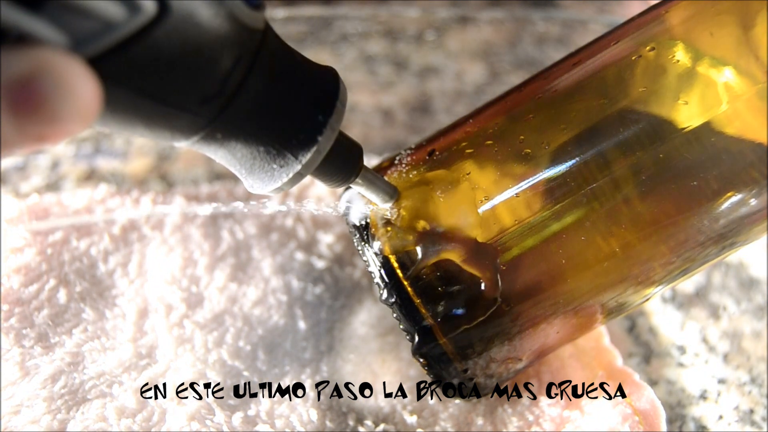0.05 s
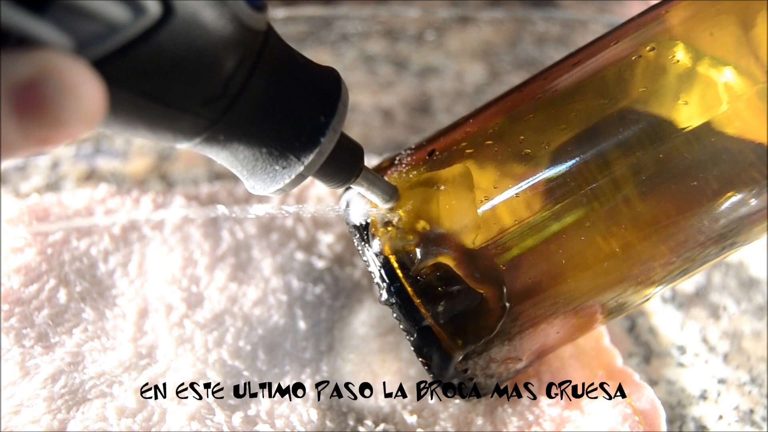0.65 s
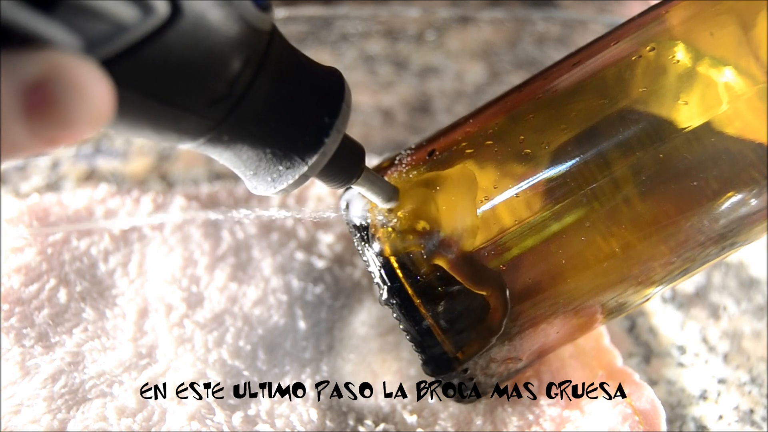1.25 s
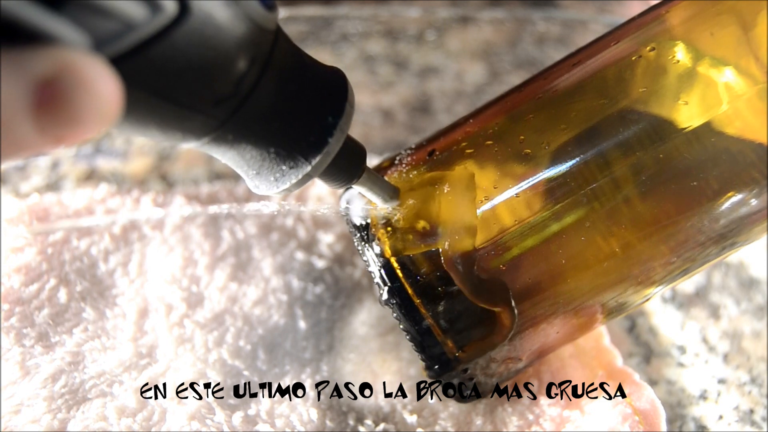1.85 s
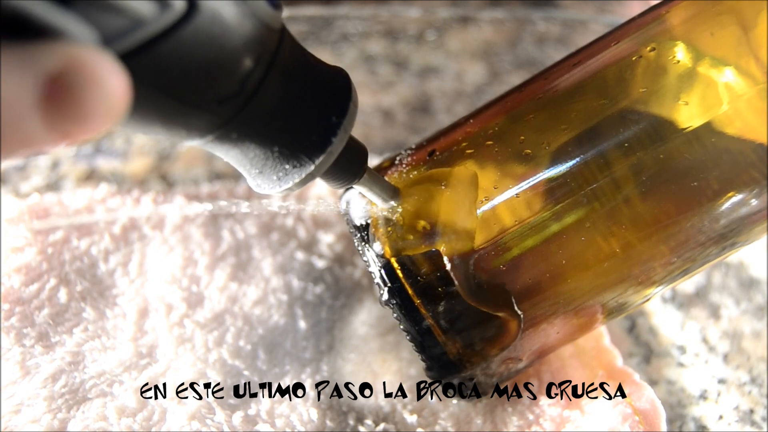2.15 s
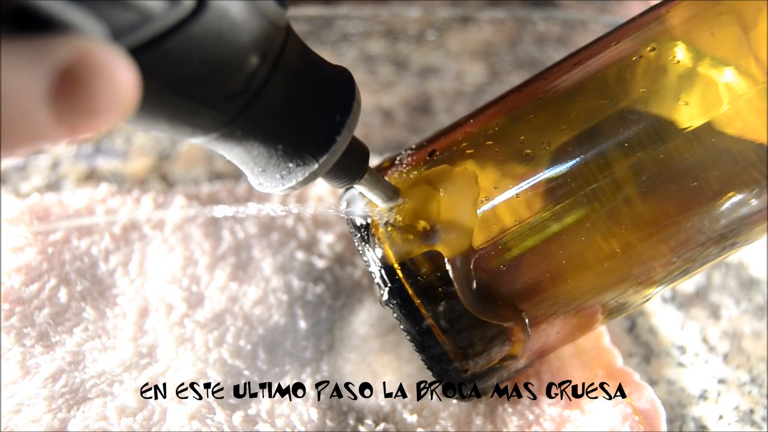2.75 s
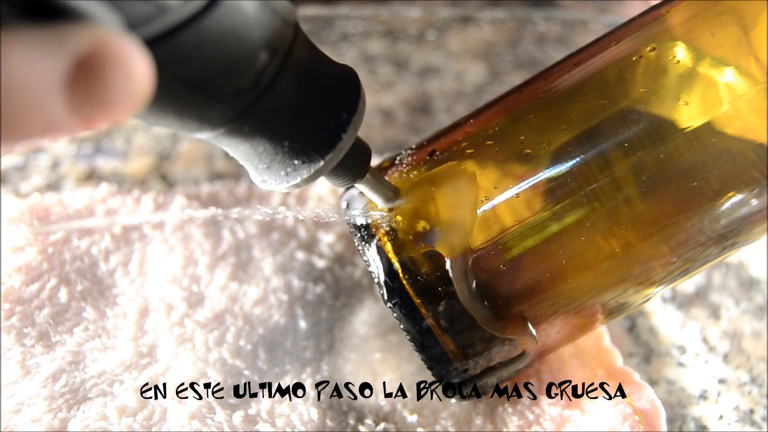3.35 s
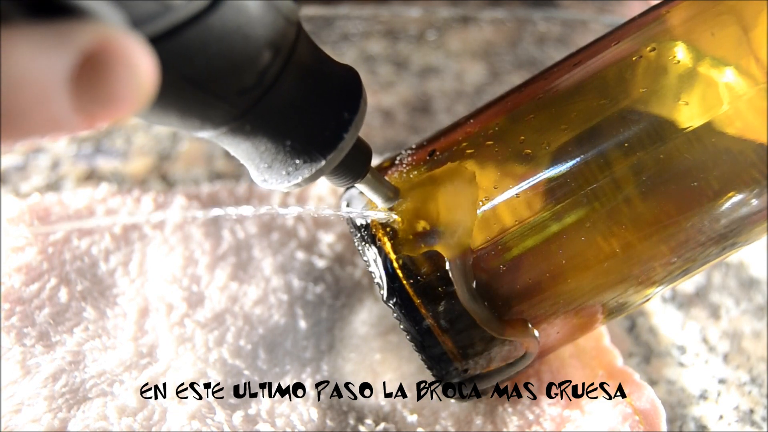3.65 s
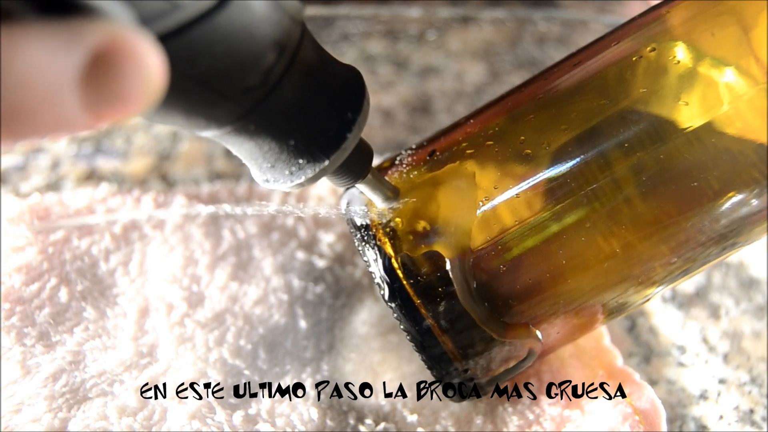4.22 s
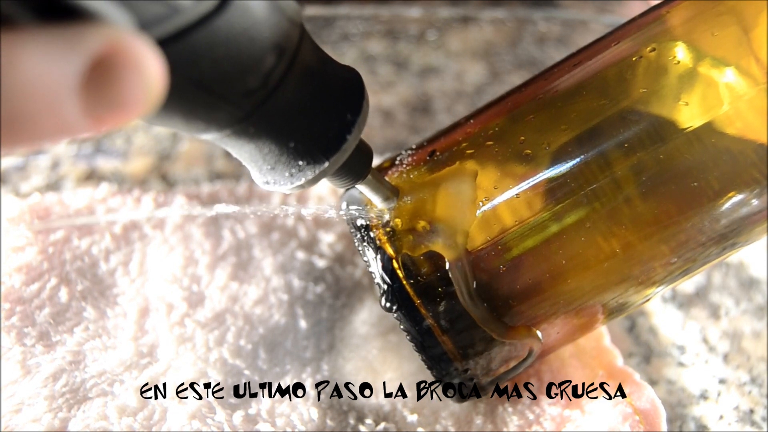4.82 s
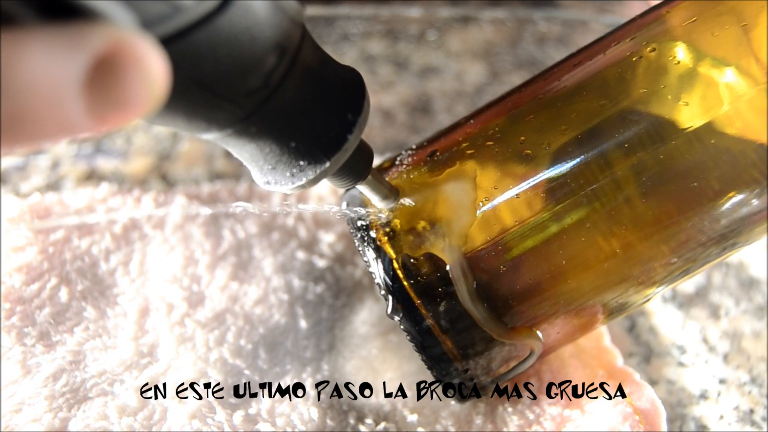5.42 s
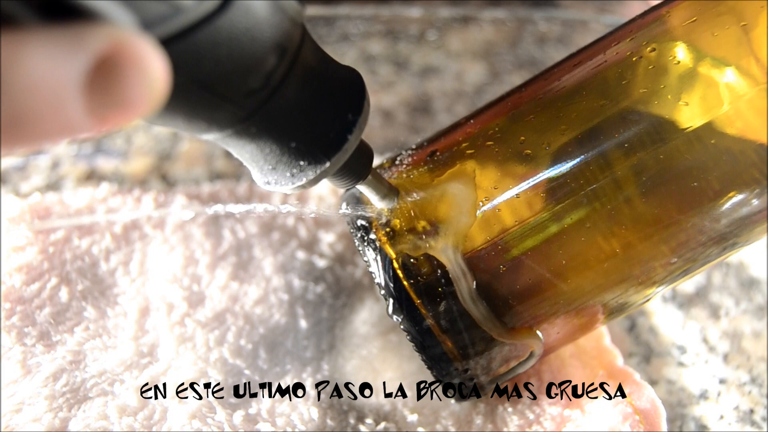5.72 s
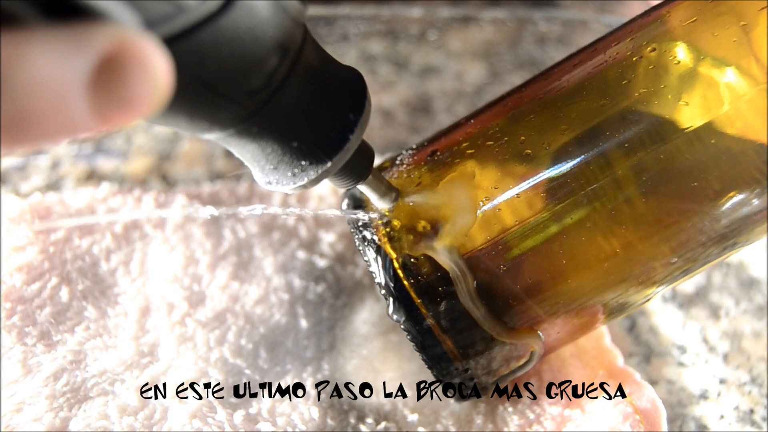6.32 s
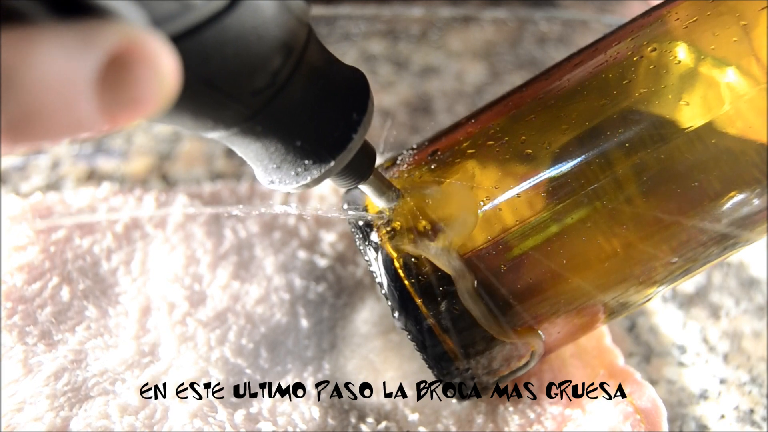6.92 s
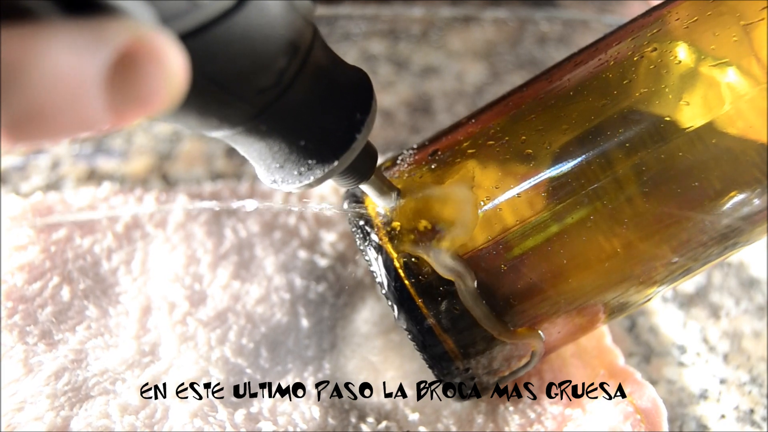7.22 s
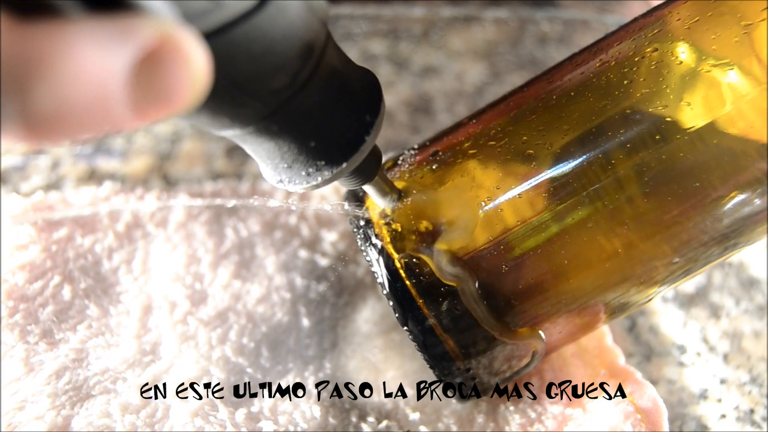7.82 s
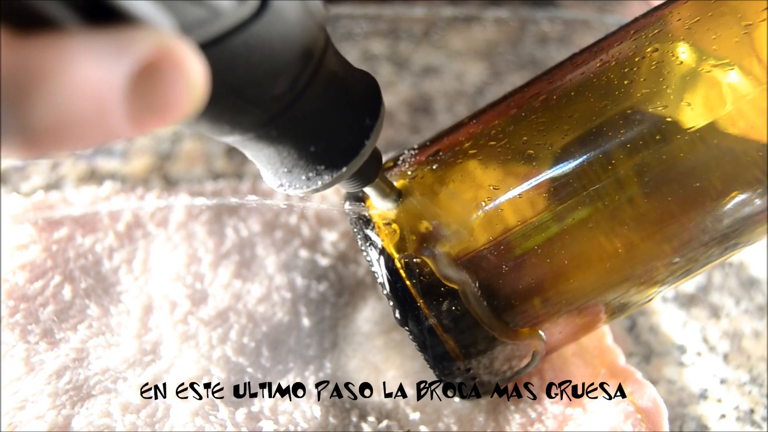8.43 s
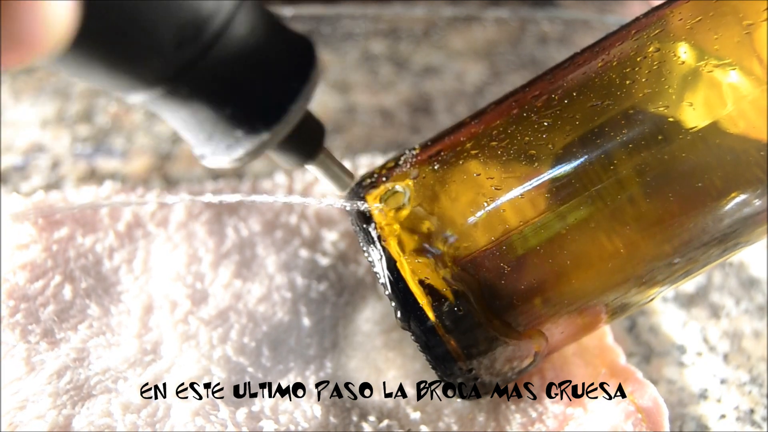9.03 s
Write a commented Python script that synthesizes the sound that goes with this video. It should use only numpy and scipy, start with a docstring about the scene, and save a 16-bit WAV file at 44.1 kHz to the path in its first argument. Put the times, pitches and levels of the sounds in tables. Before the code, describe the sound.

A handheld rotary tool whines at high speed as its bit grinds into a wet glass bottle, close to the microphone. Shrill scratching alternates with short, growling bites that make the glass ring. From about halfway a buzzing chatter grows and the motor's pitch sinks. Near the end the bit jams with a squeal and sharp clicks, scrapes the rim, knocks it and comes free, and the motor revs up.

```python
"""Drilling a glass bottle.

A handheld rotary tool grinds a hole through a wet glass bottle, close by. The bit takes turns biting
into the wall and skittering over it, touching once every turn. Pressed harder, it chatters and the motor
slows. It jams with a squeal, picks up speed, knocks the rim and comes free, and the motor revs up."""
import sys
import numpy as np
from scipy import signal
from scipy.fft import rfft, irfft, next_fast_len
from scipy.io import wavfile
from scipy.ndimage import map_coordinates

SR = 44100
rng = np.random.default_rng(int(sys.argv[2]) if len(sys.argv) > 2 else 0)


def materialize(psi):
    """Save the field psi as 16-bit PCM at rate SR to the path in sys.argv[1].

    A 1-D psi becomes a single channel; in a 2-D psi each row is a channel.
    """
    bounded = np.clip(np.atleast_2d(psi).T, -1, 1)
    quanta = np.round(bounded * 32767).astype(np.int16)
    wavfile.write(sys.argv[1], SR, quanta)


N = 404397
T = np.arange(N) / SR
JAM_S, FREE_S = 8.048, 8.958  # when the bit jams and when it comes free


def amp(db):
    """Turn decibels into a gain."""
    return 10 ** (np.asarray(db) / 20)


def unit(x):
    """Scale a signal to an average power of 1."""
    return x / np.sqrt(np.mean(x ** 2) + 1e-20)


def along(points, hz):
    """Read a (frequency, value) table at any frequency, on a log scale."""
    freqs, values = np.transpose(points)
    return np.interp(np.log(hz + 1), np.log(freqs), values)


def curve(points):
    """Join (time, value) points with straight lines."""
    return np.interp(T, *np.transpose(points))


def wobble(rate):
    """A smooth random curve with `rate` new values a second."""
    return map_coordinates(rng.standard_normal(int(N * rate / SR) + 4), [T * rate])


def swell(s, half_length):
    """A bell-shaped rise and fall around time s."""
    return np.exp(-.5 * ((T - s) / half_length) ** 2)


def bump(t, middle, length, steepness=3.1):
    """A flat-topped rise and fall."""
    return .5 ** np.minimum(np.abs(2 * (t - middle) / length), 10) ** steepness


def bursts(rows):
    """The summed power of (middle, length, level) bumps."""
    t = T[::20]
    return np.interp(T, t, sum(amp(db) ** 2 * bump(t, s, length) for s, length, db in rows))


def filtered(x, response):
    """Scale each frequency in x by response(frequency)."""
    size = next_fast_len(N + SR // 2)
    return irfft(rfft(x, size) * response(np.fft.rfftfreq(size, 1 / SR)), size)[:N]


def coloured(x, spectrum):
    """Shape x with a (frequency, level) table, at a power of 1."""
    return unit(filtered(x, lambda hz: amp(along(spectrum, hz))))


def turns_of(speed, waver):
    """Turns made so far at a slightly unsteady speed."""
    return np.cumsum(speed * (1 + waver * wobble(25))) / SR


def grit(turns, memory, fresh_db, size=256):
    """A rough surface passes once a turn and wears over `memory` turns; chips add fresh noise."""
    surface = rng.standard_normal((int(turns[-1]) + 2, size))
    surface = signal.lfilter([1], [1, -np.exp(-1 / memory)], surface, axis=0)
    passing = unit(map_coordinates(surface.ravel(), [turns * size]))
    return passing + amp(fresh_db) * rng.standard_normal(N)


def touch(turns, depth_db, scatter_db):
    """The off-centre bit presses on the glass once a turn, never twice alike."""
    return amp(depth_db * np.cos(2 * np.pi * turns) + scatter_db * wobble(200))


def harmonics(turns, speed, spectrum, flutter_db, top, fourth_db=0):
    """Tones at multiples of a turning speed, shaped by the body they shake; high ones flutter more."""
    out = np.zeros(N)
    for k in range(3, top + 1):
        db = along(spectrum, k * speed) + fourth_db * (k % 4 == 0)
        db += flutter_db * k / top * wobble(28)
        out += amp(db) * np.sin(2 * np.pi * (k * turns + rng.random()))
    return out


# The steady growl as the hand feeds the bit in: (time [s], level [dB])
FEED_LEVEL = [(0, -22.5), (3.6, -22.5), (4.6, -18), (6.2, -19), (7.1, -18), (8.0, -16.5), (8.35, -22.5),
              (8.95, -21.5)]
# The bit digs into the wall: (middle [s], length [s], level [dB])
BITE_BURSTS = [(.02, 0.071, -20), (.225, 0.067, -21), (.47, 0.047, -19), (.54, 0.027, -20.5),
               (.605, 0.036, -19), (.68, 0.016, -19.5), (.745, 0.087, -18.5), (.975, 0.054, -19),
               (1.23, 0.036, -18.5), (1.47, 0.12, -18.5), (1.66, 0.035, -21), (1.76, 0.037, -20.5),
               (1.835, 0.028, -19), (1.94, 0.05, -19.5), (2.01, 0.031, -19.5), (2.125, 0.15, -18.5),
               (2.31, 0.044, -19), (2.425, 0.018, -19), (2.49, 0.0582, -19), (2.685, 0.073, -19.5),
               (2.84, 0.073, -17.5), (2.955, 0.057, -18.5), (3.15, 0.089, -19), (3.32, 0.028, -19.5),
               (3.545, 0.037, -17.5), (3.795, 0.042, -16.5), (4.23, 0.052, -18.5), (4.345, 0.063, -20)]
def bite_rise_db():
    """How far the bites rise above the steady feed."""
    return 10 * np.log10(1 + bursts(BITE_BURSTS) / amp(curve(FEED_LEVEL)) ** 2)


# Instants of lost grip: (middle [s], length [s], depth [dB])
GRIP_LOSSES = [(4.669, 0.012, 7), (4.93, 0.011, 6), (5.532, 0.018, 4.5), (5.6, 0.013, 8), (5.746, 0.022, 6),
               (6.665, 0.045, 3.5), (7.027, 0.029, 3.5), (8.054, 0.012, 16), (8.091, 0.03, 8.5)]
def grip_db():
    """The level dips while the bit loses its grip on the wall."""
    return -sum(depth * bump(T, s, length) for s, length, depth in GRIP_LOSSES)


# The motor's speed up to the jam, before bites slow it: (time [s], speed [turns/s])
BASE_SPEED = [(0, 204.7), (.78, 206), (1.25, 209.6), (2.0, 211.9), (2.33, 210.3), (2.8, 212.7),
              (3.1, 210.8), (4.17, 210.9), (4.38, 205.9), (4.72, 208.9), (5.0, 206.8), (5.5, 198),
              (6.0, 196.2), (6.6, 189), (7.02, 180.8), (7.65, 185), (7.97, 178.8)]
# The motor jams, recovers, then revs up: (time [s], target speed [turns/s], settling time [s])
SPEED_CHANGES = [(8.03, 140, .025), (8.08, 163.5, .33), (8.915, 228, .36)]
def motor_speed():
    """Turns a second: the motor settles after each sudden change of load and sags with each bite."""
    speed = curve(BASE_SPEED)
    for s, target, lag in SPEED_CHANGES:
        settling = target + (speed[int(s * SR)] - target) * np.exp(-np.maximum(T - s, 0) / lag)
        speed = np.where(T < s, speed, settling)
    return speed - .25 * bite_rise_db()


# How strongly the tool's body hums at each pitch: (frequency [Hz], level [dB])
HUM_SPECTRUM = [(150, -57), (197, -56), (205, -49), (295, -45), (345, -68), (365, -46.5), (380, -63),
                (408, -56), (422, -50)]
def rotor_hum(turns, speed):
    """The unbalanced rotor hums at its turning speed and an octave above."""
    hum = np.zeros(N)
    for k in (1, 2):
        db = along(HUM_SPECTRUM, k * speed) + k * .86 * wobble(25)
        hum += amp(db) * np.sin(2 * np.pi * k * turns)
    return np.sqrt(2) * hum


# The tone of the plastic housing: (frequency [Hz], level [dB])
HOUSING_SPECTRUM = [(1650, -18.5), (1870, -3.5), (2060, -21), (2290, -7), (2550, -20), (2740, -4.5),
                    (3000, -6), (3150, 0.5), (3290, 2), (3400, -13), (3560, -11), (3700, 3), (3790, -2.5),
                    (3890, 7), (3990, -9), (4110, -7), (4500, -34)]
def housing_buzz(turns, speed, free):
    """The motor shakes its housing once a turn; less so in a bite, pressed hard or running free."""
    pressed = 1 + amp(curve(CHATTER_LEVEL) + 22.5) ** 2
    gain = amp(-28 - 19 * free - .87 * bite_rise_db()) / pressed * (speed / 208) ** 3
    return gain * harmonics(turns, speed, HOUSING_SPECTRUM, flutter_db=3.5, top=22)


def commutator_whine(turns, free, pulses_per_turn=18):
    """The motor's spinning contacts whine, standing out once the bit is free."""
    return amp(-39.5 + 13.7 * free) * np.sin(2 * np.pi * pulses_per_turn * turns)


# The rush of air in the tool: (frequency [Hz], level [dB])
FAN_SPECTRUM = [(30, -46), (130, -26.5), (300, -13), (600, -14), (1220, 6), (1850, 2), (2550, -2.5),
                (3200, 0.5), (4100, -8), (7000, -2), (8000, -13.5), (9300, -7), (11400, -29)]
def fan_air(turns, speed, free):
    """The fan blows air through the vents, louder the faster it spins."""
    air = coloured(grit(turns, memory=6.9, fresh_db=4.5), FAN_SPECTRUM)
    return amp(-29 + 7.6 * free) * (speed / 200) ** 3 * air


# The bit catches and jolts the bottle: (time [s], half length [s], level [dB])
JOLTS = [(6.953, .005, -38), (7.005, 0.0061, -33), (8.041, .01, -27.5), (8.06, 0.0047, -27)]
def bottle_shudder():
    """The bottle shudders in the hand at each catch and trembles while the bit rubs the rim."""
    jolts = sum(amp(db) * swell(s, half) for s, half, db in JOLTS)
    tremble = amp(-41.5 + 2.5 * wobble(20)) * (T > JAM_S) * (T < FREE_S)
    rumble = coloured(rng.standard_normal(N), [(30, -22), (300, 5.5), (700, 10), (2000, -30)])
    return (jolts + tremble) * rumble


# The bit knocks and chips the rim: (time [s], level [dB])
RIM_KNOCKS = [(4.31, -13), (6.948, -14), (7.004, -11), (8.029, -11), (8.042, -11), (8.059, -6),
              (8.859, -1.5), (8.864, -2)]
# The notes of the knocked bottle: (frequency [Hz], level [dB])
GLASS_NOTES = [(650, -8), (1020, -1), (1380, 0), (1620, 0), (1950, -3), (2720, -7), (4000, -8)]
def knocks(ring_s=.014, crumble_s=.05):
    """Sharp blows trailed by splinters ring the bottle; the hand quickly damps it."""
    splinters = unit(rng.standard_normal(N) ** 3)
    trails = sum(amp(db - 60 * np.abs(T - s) / crumble_s) * (T >= s) for s, db in RIM_KNOCKS)
    force = amp(-21) * splinters * trails
    for s, db in RIM_KNOCKS:
        force[int(s * SR)] += amp(db)
    t = T[:SR // 10]
    ring = sum(amp(db - 60 * t / ring_s) * np.cos(2 * np.pi * hz * t) for hz, db in GLASS_NOTES)
    struck = signal.fftconvolve(force, ring / np.abs(ring).max())[:N]
    return amp(2) * filtered(struck, lambda hz: hz ** 3 / (hz ** 3 + 450 ** 3))  # too small for bass


# Short squeaks of the bit: (time [s], half length [s], pitch [Hz], level [dB])
BIT_SQUEAKS = [(6.947, 0.007, 2870, -23), (7.007, 0.0043, 2837, -22), (8.02, 0.012, 2898, -18),
               (8.032, 0.0064, 3160, -14), (8.051, 0.0051, 3420, -15.5), (8.061, .012, 3160, -19),
               (8.72, 0.013, 2790, -22), (8.927, 0.02, 1584, -26)]
def squeaks():
    """The bit sticks and slips, singing at an unsteady pitch; shorter squeaks are rougher."""
    waver, out = wobble(700), np.zeros(N)
    for s, half, hz, db in BIT_SQUEAKS:
        near = np.abs(T - s) < 4 * half
        phase = 2 * np.pi * hz * np.cumsum(1 + .0007 / half * waver[near]) / SR
        tone = np.sin(phase) + amp(-16) * np.sin(3 * phase)
        out[near] += amp(db + 5.5) * swell(s, half)[near] * tone
    return out


# The notes of the rubbed rim: (frequency [Hz], half width [Hz], level over the scratching [dB])
RIM_NOTES = [(739, 22, -5.5), (1188, 17, -1.5), (2225, 12, -10.5), (2830, 30, -8.5), (5090, 57.4, -6.5),
             (5602, 39, -7)]
def rim_squeal(speed, laps_per_turn=.995):
    """The bit rubs the open rim; as it speeds up, one harmonic after another hits a note and sings."""
    rubbing = (T > JAM_S) & (T < FREE_S)
    lap_hz = (speed * (laps_per_turn + .0027 * wobble(150)))[rubbing]
    laps, out = np.cumsum(lap_hz) / SR, np.zeros(N)
    for hz, width, db in RIM_NOTES:
        tone = sum(np.sin(2 * np.pi * k * laps) / (1 + ((k * lap_hz - hz) / width) ** 2)
                   for k in range(1, 38))
        out[rubbing] += amp(db + 3.2 * wobble(50)[rubbing]) * tone
    fade_in = np.clip((T - JAM_S) / .088, 0, 1)
    return out * amp(curve(SCRATCH_LEVEL)) * fade_in


# The chatter of the bit under pressure: (time [s], level [dB])
CHATTER_LEVEL = [(0, -38.5), (3.3, -37.5), (3.9, -30), (4.4, -31.5), (4.65, -26.5), (5.3, -25.5),
                 (5.9, -28.5), (6.4, -26), (7.1, -27.5), (7.7, -25.5), (7.98, -25.5), (8.02, -47)]
# The rolling bit slips more under load: (speed [turns/s], rolling [laps/turn])
LAPS_PER_TURN = [(184, .978), (208.5, .986)]
# The tone of the wall as the bit rolls on it: (frequency [Hz], level [dB])
WALL_SPECTRUM = [(540, -33), (625, -13), (715, 0), (776, -1.5), (820, -3), (893, -3.5), (942, 4), (970, -9),
                 (1030, -11.5), (1330, -12), (1430, -10), (1510, -3.5), (1552, 3.5), (1610, -2.5),
                 (1760, -3.5), (1850, 0.5), (1980, -14.5), (2260, -5.5), (2550, -15)]
def chatter(speed):
    """The bit rolls round the hole and makes the wall buzz; bites and lost grip break the tone."""
    lap_hz = speed * along(LAPS_PER_TURN, speed)
    laps = turns_of(lap_hz, waver=.0012)
    # Four strikes a lap lift every fourth harmonic.
    tone = harmonics(laps, lap_hz, WALL_SPECTRUM, flutter_db=2.5, top=13, fourth_db=5)
    level_db = curve(CHATTER_LEVEL) + 1 + grip_db() - 1.5 * bite_rise_db()
    return amp(level_db) * tone * (T < FREE_S)


# The glass ringing under a bite: (frequency [Hz], level [dB])
RING_SPECTRUM = [(800, -42), (1230, 7), (1340, -17), (1470, 0.5), (1660, 1), (2100, -28)]
def wall_ring(turns, speed, bite_db, wall_hz=1250):
    """Hard bites ring the wall; it sings when the sixth harmonic meets its note, and hoots below."""
    in_tune = np.exp(-((6 * speed - wall_hz) / 45) ** 4)
    sing = amp(-20.5 + 3.6 * np.minimum(bite_db + 17, 1)) * np.sin(2 * np.pi * 6 * turns)
    hoot = amp(-30.5 + .47 * (bite_db + 23) + 4.9 * wobble(60)) * np.sin(2 * np.pi * 3 * turns)
    # Both fade once the bit starts to roll, the hoot first.
    rolling_db = curve(CHATTER_LEVEL)
    sing /= 1 + amp(rolling_db + 31.5) ** 2
    hoot /= 1 + amp(rolling_db + 36) ** 2
    rough_ring = coloured(grit(turns, memory=3.9, fresh_db=-2.5), RING_SPECTRUM)
    return in_tune * (sing + hoot) + amp(-4.5) * np.sqrt(bursts(BITE_BURSTS)) * rough_ring


# The low sound of glass being ground: (frequency [Hz], level [dB])
GROWL_SPECTRUM = [(130, -51), (420, -27), (560, -22.5), (660, -12), (1000, -11.5), (1150, -6.5),
                  (1340, -8.5), (1830, -2), (2050, -13.5), (2550, -15), (3500, -17), (3950, -4),
                  (4600, -13.5), (11000, -48)]
def growl(turns, bite_db):
    """The biting bit drags over rough glass, pressing once a turn."""
    rubbing = grit(turns, memory=3.8, fresh_db=-2.5) * touch(turns, depth_db=2.7, scatter_db=2)
    return amp(bite_db - 2) * coloured(rubbing, GROWL_SPECTRUM)


# The bit's steady scratching: (time [s], level [dB])
SCRATCH_LEVEL = [(0, -17.5), (2.3, -16.5), (4.4, -18.5), (7.3, -18.5), (8.11, -19.5), (8.27, -15.5),
                 (8.81, -15.5), (8.89, -27)]
# Shrill skids over the glass: (middle [s], length [s], level [dB])
SKID_BURSTS = [(.11, 0.037, -20), (.56, 0.037, -19), (.67, 0.032, -19.5), (1.055, 0.046, -18),
               (1.195, 0.043, -18), (1.36, 0.025, -17.5), (1.45, 0.053, -20), (1.57, 0.033, -25),
               (1.745, 0.044, -18), (1.94, 0.041, -19), (2.58, 0.043, -21), (2.75, 0.026, -21),
               (2.935, 0.057, -18), (3.0, 0.037, -22), (3.2, 0.056, -20.5), (3.28, 0.042, -21),
               (3.45, 0.042, -18.5), (3.7, 0.061, -18), (4.09, 0.06, -18), (4.195, 0.024, -15),
               (4.315, 0.019, -15.5), (4.64, 0.059, -20), (7.0, 0.02, -19), (8.945, 0.044, -15.5)]
# The bright sound of scratched glass: (frequency [Hz], level [dB])
SCRATCH_SPECTRUM = [(500, -40), (2250, -11), (2550, -16.5), (2800, -8.5), (3450, -14.5), (4030, -6.5),
                    (4380, -11.5), (4680, -17.5), (5120, -0.5), (5300, -2), (5520, 2.5), (5820, -3),
                    (6130, -0.5), (6900, -1.6), (7130, -10), (7950, -16.5), (9100, -12.5), (9680, -8.5),
                    (10550, -18.5), (10800, -13), (11400, -43)]
def scratching(speed, bite_db):
    """A fast, lightly biting bit skips once a turn; otherwise it scrapes all the way round."""
    turns = turns_of(speed, waver=.001009)
    skips = grit(turns, memory=14, fresh_db=-15) * touch(turns, depth_db=5.5, scatter_db=1)
    scrape = grit(turns, memory=1.93, fresh_db=-1.5) * touch(turns, depth_db=2, scatter_db=1.5)
    skips, scrape = coloured(skips, SCRATCH_SPECTRUM), coloured(scrape, SCRATCH_SPECTRUM)
    on_rim = np.clip((T - JAM_S) / .53, 0, 1)
    duller = filtered(scrape, lambda hz: amp(along([(6500, 0), (9000, -4.5)], hz)))
    scrape = (1 - on_rim) * scrape + on_rim * duller
    bouncing = np.clip(speed / 212, 0, 1) ** 4 / (1 + amp(4.2 * (bite_db + 21)))
    scratch = np.sqrt(bouncing) * skips + np.sqrt(1 - bouncing) * scrape
    sliding = amp(curve(SCRATCH_LEVEL) - .35 * bite_rise_db())  # bites quieten the scratching
    level_db = 10 * np.log10(sliding ** 2 + bursts(SKID_BURSTS)) + .41 * grip_db()
    uneven_db = 1.1 * bouncing * wobble(30)
    return amp(level_db + 1 + uneven_db) * scratch


def grinding(speed):
    """The bit growls, rings the wall and scratches until it leaves the glass."""
    bite_db = curve(FEED_LEVEL) + bite_rise_db() + grip_db()
    contact = np.clip((FREE_S - T) / .0045 + 1, 0, 1)
    dragged_turns = turns_of(speed * .987, waver=.00402)
    biting = growl(dragged_turns, bite_db) + wall_ring(dragged_turns, speed, bite_db)
    return contact * (biting + scratching(speed, bite_db))


def scene():
    """The tool and the bottle, heard from close by."""
    speed = motor_speed()
    turns = turns_of(speed, waver=.00079)
    free = np.clip((T - FREE_S) / .03 + 1, 0, 1)  # 0 in the glass, 1 once out
    motor = rotor_hum(turns, speed) + housing_buzz(turns, speed, free)
    motor += commutator_whine(turns, free) + fan_air(turns, speed, free)
    glass = grinding(speed) + chatter(speed) + rim_squeal(speed)
    glass += squeaks() + bottle_shudder() + knocks()
    return (motor + glass)[None]


def record(dry, ceiling=.9, top_hz=11600):
    """Round off the highest peaks and cut the very top of the treble."""
    rounded = dry[0] / (1 + np.abs(dry[0] / ceiling) ** 12) ** (1 / 12)
    return filtered(rounded, lambda hz: hz < top_hz)[None]


dry = scene()
out = record(dry)
materialize(out)
```